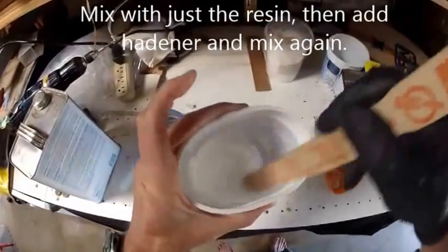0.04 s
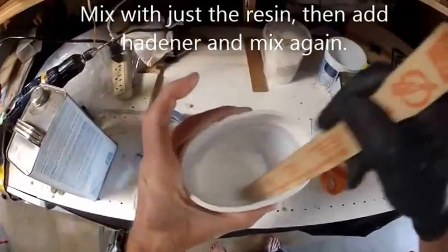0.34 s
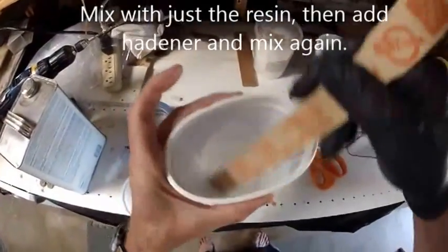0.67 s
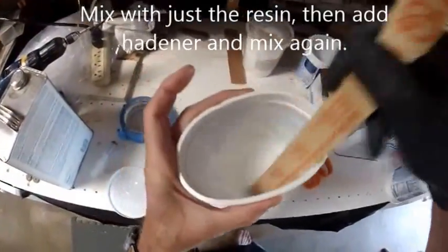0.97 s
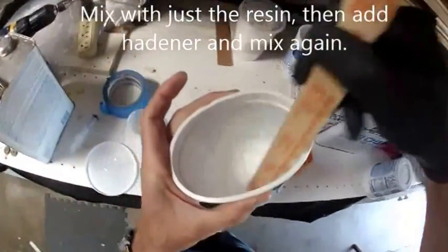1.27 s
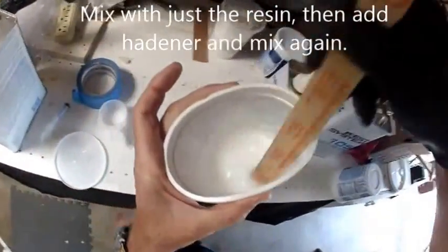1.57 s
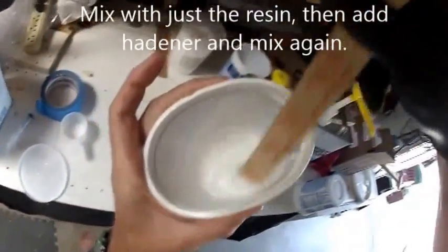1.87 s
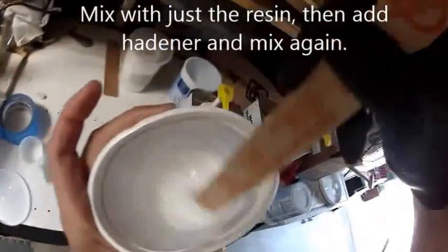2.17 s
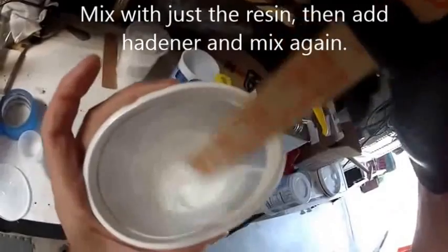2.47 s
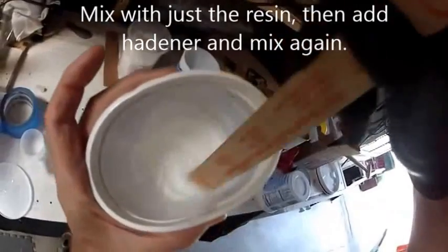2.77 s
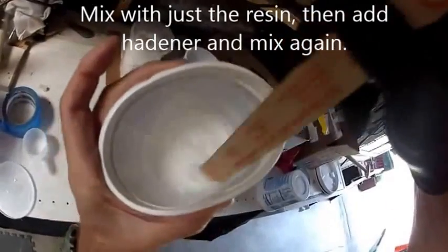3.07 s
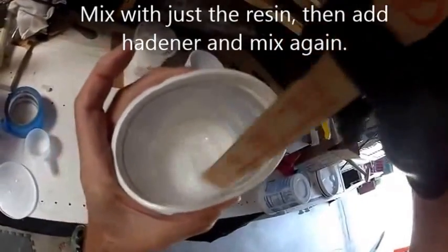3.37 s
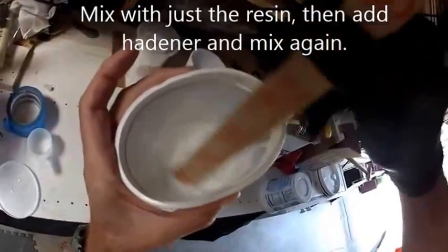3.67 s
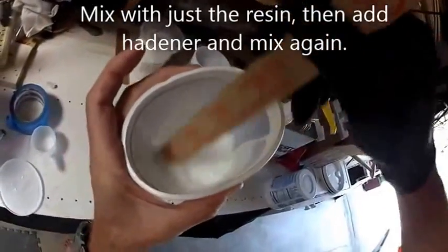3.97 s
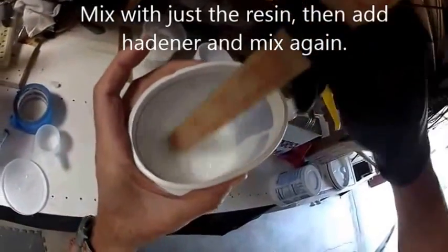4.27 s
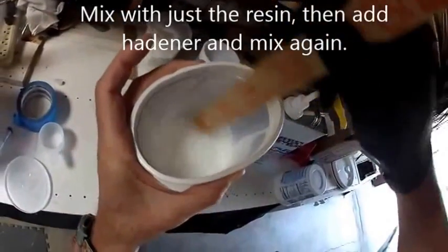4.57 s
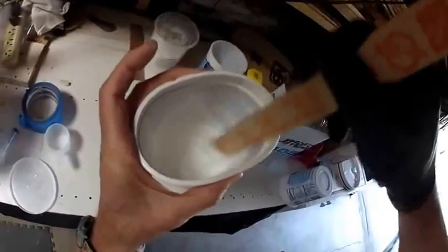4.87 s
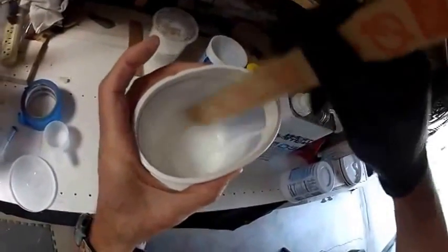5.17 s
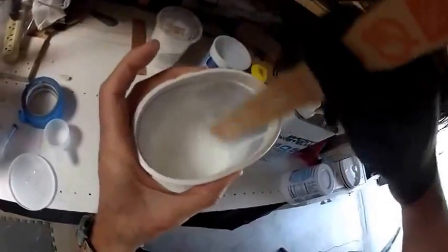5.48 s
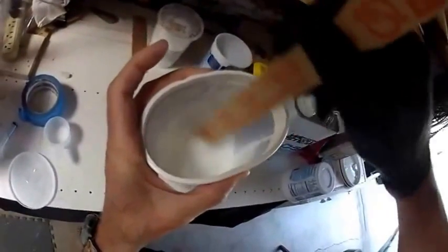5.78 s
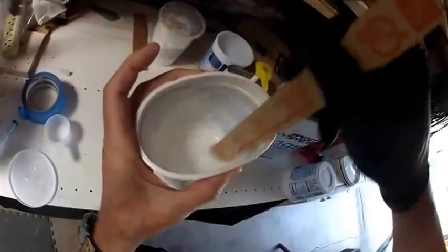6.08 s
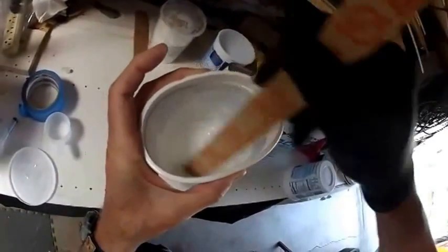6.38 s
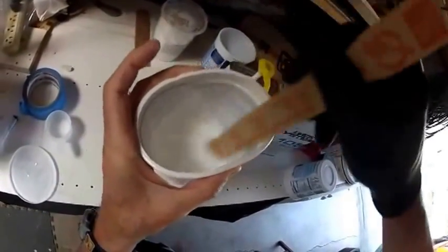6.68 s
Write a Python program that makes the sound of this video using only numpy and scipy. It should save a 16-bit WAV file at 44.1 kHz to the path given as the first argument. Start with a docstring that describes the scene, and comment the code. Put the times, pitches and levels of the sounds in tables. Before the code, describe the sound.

Quick, gritty scrapes and irregular hollow knocks run throughout as a wooden stick mixes resin around a plastic cup. Short rasps and a light sticky crackle come through, and the hardest knocks stand out sharply. After about four seconds the resin also closes behind the stick with soft, rising swishes. The microphone is very close, in a small workshop with little echo and faint low background noise.

```python
"""A wooden stick stirs resin in a hand-held plastic cup, close to a body-worn camera in a workshop.
From the start it drags along the wall about six times a second, among quicker, uneven knocks: friction
and impacts excite the cup's hollow ring, while threads of wet resin crackle. Now and then the edge
catches and rasps, and the hardest knocks overload the microphone. After about four seconds, as the
stirring goes on, the resin also begins to close behind the stick with dull, rising swishes."""
import sys
import numpy as np
from scipy import signal
from scipy.fft import rfft, irfft, next_fast_len
from scipy.io import wavfile
from scipy.ndimage import uniform_filter1d

SR = 44100
rng = np.random.default_rng(int(sys.argv[2]) if len(sys.argv) > 2 else 0)


def dump(signal):
    """Clip the signal to [-1, 1] and save it as 16-bit WAV at the path in sys.argv[1]."""
    limited = np.clip(np.atleast_2d(signal).T, -1, 1)
    pcm = np.round(limited * 32767).astype(np.int16)
    wavfile.write(sys.argv[1], SR, pcm)


N = 306054

# blows of the stick on the cup: (time [s], ring level [dB], tick level [dB], pitch of the cup [Hz])
KNOCKS = [(0.013,-9,-19,485), (0.0974,-12.5,-33.5,570), (0.1425,-11.5,-21.5,540), (0.1915,-13,-31,604),
          (0.209,-9,-23,575), (0.2675,-16,-23,500), (0.4295,-11.5,-30,544), (0.542,-3,-25,608),
          (0.621,-5.5,-29,559), (0.6955,-12,-35,520), (0.729,-12.5,-41,589), (0.819,-10.5,-30,560),
          (0.8255,2.5,-16,592), (0.871,-10,-31,592), (0.897,-9.5,-25,493), (1.0475,-10,-23,602),
          (1.1115,-11.5,-28.5,543), (1.215,-16,-21.5,620), (1.23,-9,-28,612), (1.255,-9,-40.5,555),
          (1.4035,-8.5,-19.5,544), (1.4725,-12.5,-39,520), (1.509,-10,-22,595), (1.623,-42,-31,560),
          (1.7394,-9,-22,590), (1.813,-9,-26,558), (1.9555,-9,-22.5,536), (2.0343,-13,-25.5,585),
          (2.045,-10,-22,587), (2.073,-11.5,-22.5,568), (2.1445,-14,-28,586), (2.3383,-11.5,-20.5,518),
          (2.47,-9,-27.5,538), (2.542,-16.5,-38,500), (2.611,-19,-24.5,460), (2.6288,-0.5,-5,580),
          (2.653,-8.5,-22,457), (2.887,-33,-24,493), (2.9297,-13,-23,595), (3.002,-9,-29,582),
          (3.0265,-5.5,-23,540), (3.0965,-13,-23,585), (3.256,-9.5,-26.5,555), (3.42,-21.5,-28,598),
          (3.4917,-28,-20,560), (3.575,-4.5,-24.5,564), (3.714,-11.5,-30,587), (3.843,-7,-18.5,528),
          (4.101,-12.5,-28,600), (4.1159,-3,-12.5,512), (4.154,-10,-25,590), (4.1853,-12,-48.5,580),
          (4.2288,-48,-28,487), (4.2505,-14.5,-25.5,560), (4.3607,-5.5,-22.5,590), (4.383,-8,-18.5,570),
          (4.4385,-7,-41.5,520), (4.6287,-2,-10.5,513), (4.6505,-7.5,-34.5,544), (4.898,-9.5,-12,536),
          (4.959,-12,-35,590), (5.043,-16.5,-26.5,576), (5.1482,-3.5,-26.5,558), (5.1753,-11,-16,468),
          (5.2513,-4,-28,544), (5.2868,-30,-26,486), (5.421,-10.5,-17,606), (5.479,-14,-17.5,533),
          (5.6155,-13.5,-40,546), (5.717,-4,-23.5,595), (5.792,-9.5,-17,547), (5.8309,-11.5,-33,460),
          (5.85,-9.5,-22,559), (6.0422,-22,-23,510), (6.055,-11,-31,540), (6.079,-10.5,-31.5,531),
          (6.14,-32,-24,585), (6.339,-10,-15,511), (6.406,-12,-31,610), (6.4546,-45,-26.5,584),
          (6.4893,-10,-23,610), (6.6097,-2,-17.5,572), (6.852,-11,-36,600), (6.866,-6,-14,497),
          (6.93,-6,-33.5,600)]
# drags along the wall: (start [s], end [s], grit level [dB], ring level [dB])
STROKES = [(0,0.03,-26.5,-20), (0.28,0.345,-26.5,-16), (0.391,0.464,-38,-27), (0.524,0.645,-27,-18),
           (0.685,0.754,-43,-22), (0.801,0.935,-31.5,-28), (1.017,1.083,-41,-33.5),
           (1.134,1.224,-31.5,-21.5), (1.298,1.359,-39,-28), (1.426,1.537,-35.5,-28.5),
           (1.747,1.904,-40,-24), (2.027,2.177,-39,-28), (2.334,2.512,-37,-28.5), (2.604,2.769,-32.5,-24.5),
           (2.921,3.113,-35.5,-23), (3.157,3.197,-28.5,-37), (3.237,3.408,-34.5,-24.5),
           (3.454,3.506,-27,-31.5), (3.544,3.667,-31.5,-24.5), (3.715,3.772,-27.5,-26),
           (3.811,3.924,-32,-26), (4.094,4.195,-33.5,-30), (4.362,4.434,-29.5,-17), (4.61,4.705,-31,-23.5),
           (4.746,4.804,-32.5,-26.5), (4.873,4.972,-29,-20.5), (5.037,5.129,-34.5,-29),
           (5.172,5.281,-32.5,-18.5), (5.315,5.362,-36,-31), (5.466,5.549,-35,-19.5), (5.606,5.707,-32,-28),
           (5.772,5.852,-34,-16.5), (5.918,5.938,-29.5,-25), (6.037,6.124,-31,-22.5),
           (6.174,6.213,-34.5,-26), (6.266,6.282,-28,-28), (6.315,6.413,-33.5,-20.5),
           (6.466,6.521,-32.5,-20.5), (6.598,6.658,-28.5,-23), (6.746,6.794,-34.5,-22),
           (6.857,6.955,-33,-22.5)]
# spectrum of friction and crackle: (frequency [Hz], level [dB])
GRIT_SPECTRUM = [(100, 12.5), (700, -4), (1100, 11), (1700, 2.5), (2500, 4.5), (3600, 3.5), (4700, 0),
                 (5500, 1), (7300, -2), (8600, 1.5), (10000, -3.5), (10800, -9), (13300, -9), (14800, -3)]


def amp(db):
    """Amplitude ratio of a level in decibels."""
    return 10 ** (np.asarray(db) / 20)


def unit(x):
    """Normalisation to rms 1."""
    return x / np.sqrt(np.mean(x ** 2) + 1e-20)


def read(points, hz):
    """Interpolation on a logarithmic frequency axis."""
    f, value = np.transpose(points)
    return np.interp(np.log(hz + 1), np.log(f), value)


def add(mix, start_s, sound):
    """Superposition of a sound on the mix."""
    part = mix[max(round(start_s * SR), 0):][:len(sound)]
    part += sound[:len(part)]


def minimum_phase(db_at, size=2048):
    """Causal impulse response of a gain curve: phase follows from log gain by the Hilbert transform."""
    log_gain = np.log(amp(db_at(abs(np.fft.fftfreq(size, 1 / SR)))))
    spectrum = np.exp(np.conj(signal.hilbert(log_gain)))
    return np.fft.ifft(spectrum).real[:size // 2]


def colour(x, spectrum):
    """Spectral shaping by convolution, row by row, keeping the energy of white input."""
    response = minimum_phase(lambda hz: read(spectrum, hz))
    response = (response / np.linalg.norm(response)).reshape((1,) * (x.ndim - 1) + (-1,))
    return signal.oaconvolve(x, response, axes=-1)[..., :x.shape[-1]]


def wander(per_s, step=16):
    """Random modulation: Gaussian noise low-passed near per_s hertz, rms 1."""
    size = next_fast_len(N // step + 2)
    hz = np.fft.rfftfreq(size, step / SR)
    spectrum = rfft(rng.standard_normal(size)) * np.exp(-(hz / per_s) ** 2)
    return np.interp(np.arange(N) / step, np.arange(size), unit(irfft(spectrum, size)))


def slips(per_s, spread_db):
    """Poisson process of impulses with uneven size and random sign, rms 1."""
    size = amp(spread_db * np.minimum(rng.exponential(1, N), 4))
    return unit(size * rng.choice([-1, 1], N) * (rng.random(N) < per_s / SR))


def stumbles(per_s, unevenness, drift_per_s=40):
    """Quasi-periodic train of equal impulses whose rate drifts, rms 1."""
    cycles = np.cumsum(per_s * np.exp(unevenness * wander(drift_per_s))) / SR
    return unit(np.diff(np.floor(cycles), prepend=0))


def crumble(clicks, decay_s):
    """Exponential decay spreads each click's energy into a burst of noise, rms 1."""
    power = signal.lfilter([1], [1, -np.exp(-2 / (decay_s * SR))], clicks ** 2 + 1e-18)
    return unit(np.sqrt(power) * rng.standard_normal(N))


def resonate(x, hz, width_hz):
    """Damped resonator of gain 1 whose centre follows the curve hz."""
    angle = (2 * np.pi * (np.cumsum(hz / SR) % 1)).astype(np.float32)
    phasor = np.cos(angle) + 1j * np.sin(angle)
    pole = np.exp(-np.pi * width_hz / SR)
    return 2 * (phasor * signal.lfilter([1 - pole], [1, -pole], x * phasor.conj() + 1e-18)).real


def workshop_air(level_db=-46):
    """Stationary background noise, strongest in the bass."""
    # spectrum of the air: (frequency [Hz], level [dB])
    air_spectrum = [(20, -21), (45, 3), (90, -3.5), (170, -9), (300, -1.5), (600, -76), (1200, -41),
                    (3500, -26), (8000, -26), (16000, -78)]
    return amp(level_db) * colour(rng.standard_normal(N), air_spectrum)


def reverberate(x, wet_db=-16, gap_s=0.015):
    """Reverberation: faint reflections from bench and shelves decay at each band's own rate."""
    # decay of the workshop: (frequency [Hz], t60 [s])
    decay_times = [(150, 0.19), (600, 0.28), (3000, 0.2), (8000, 0.18), (15000, 0.96)]
    count = SR // 2
    echoes = rng.choice([-1., 1.], count) * (rng.random(count) < .06) * (np.arange(count) > gap_s * SR)
    hz, t, bands = signal.stft(echoes, SR, nperseg=256)
    decay = amp(-60 * t / read(decay_times, hz)[:, None])
    tail = signal.istft(bands * decay, SR, nperseg=256)[1]
    return x + amp(wet_db) * signal.fftconvolve(x, tail / np.linalg.norm(tail))[:N]


def contact_force(levels_db, grip_s=0.00089, arch_db=1, release_s=0.0058):
    """Normal force on the wall: each stroke grips quickly, bears down most midway, and lets go."""
    force = np.zeros(N)
    for (start, end, *_), db in zip(STROKES, levels_db):
        length = max(end - start, .01)
        t = np.arange(0, length + 8 * release_s, 1 / SR)
        arch = np.sin(np.pi * np.minimum(t / length, 1)) - 2 / np.pi
        contact = (1 - np.exp(-t / grip_s)) * np.exp(-np.maximum(t - length, 0) / release_s)
        add(force, start, amp(db + arch_db * arch) * contact)
    return force


def effort(flow_s=0.088):
    """Stirring effort, rms 1: a moving average, since the resin keeps flowing around each stroke."""
    evened_force = np.sqrt(contact_force([ring_db for *_, ring_db in STROKES]))
    return unit(uniform_filter1d(evened_force, round(flow_s * SR)))


def stick_modes(x, wood_db, slide=0.1):
    """The stick's bending resonances slide with the contact point and colour x at constant energy."""
    # bending modes: (frequency [Hz], bandwidth [Hz], level [dB])
    modes = [(1104, 29, -8), (1624, 123, 2), (2346, 80, 0.5), (3137, 103, 0), (3600, 205, 1),
             (5710, 590, -5), (7750, 77, 0)]
    wood = sum(amp(db) * resonate(x, hz * np.exp(slide * wander(per_s=29.3)), width)
               for hz, width, db in modes)
    return unit(x + amp(wood_db) * wood) * np.std(x)


def cup_ring(pitch_hz, damping, contact_s=0.00041, rest_hz=574.6):
    """Modal impulse response, energy 1: shell modes alternate in sign, so they swell and then cancel."""
    # modes of base and walls, which shift with flexing: (frequency at rest [Hz], level [dB], t60 [s])
    shell_modes = [(243, -19.5, 0.042), (421, -3.5, 0.037), (472, 0.5, 0.031), (574.8, 3, 0.045)]
    # steady modes of the cup and the air in it: (frequency [Hz], level [dB], t60 [s])
    hollow_modes = [(577.7, -5.5, 0.05), (742.5, -14.5, 0.033), (900, -2.5, 0.0075), (1094, -9.5, 0.029)]
    t = np.arange(3500) / SR
    modes = [((-1) ** (k + 1), hz * pitch_hz / rest_hz, db, t60)
             for k, (hz, db, t60) in enumerate(shell_modes)]
    modes += [(1, *mode) for mode in hollow_modes]
    ring = sum(sign * amp(db - 60 * t * damping / t60) * np.sin(2 * np.pi * hz * t)
               for sign, hz, db, t60 in modes)
    ring *= 1 - np.exp(-t / contact_s)
    return ring / np.linalg.norm(ring)


def flexing(push, low_hz=490, high_hz=590, damping=1.15):
    """Forced vibration: the cup, damped by the stick, blends between two tunings as its wall bends."""
    bend = np.pi / 4 * (1 + np.tanh(2 * wander(per_s=7.7)))
    slack = signal.oaconvolve(push * np.cos(bend) ** 2, cup_ring(low_hz, damping))[:N]
    taut = signal.oaconvolve(push * np.sin(bend) ** 2, cup_ring(high_hz, damping))[:N]
    return slack + taut


def handling(level_db=-42, lump_db=3, thump_db=-23, thump_hz=190, thump_s=0.0064, yield_db=-11):
    """Compliance of the hand: the cup gives, with dull lumps along strokes and a thump at each blow."""
    # spectrum of the lumps: (frequency [Hz], level [dB])
    lump_spectrum = [(25, -42), (70, 0.5), (130, -0.5), (260, -3.5), (400, -1.5), (800, -32), (3000, -52)]
    lumps = effort() * unit(amp(lump_db * wander(per_s=25))) * slips(per_s=400, spread_db=3)
    out = amp(level_db) * colour(lumps, lump_spectrum)
    t = np.arange(SR // 30) / SR
    envelope = t / thump_s * np.exp(1 - t / thump_s)
    for start, hollow_db, *_ in KNOCKS:
        hz = thump_hz * np.exp(rng.random() - .5)
        give_db = min(hollow_db, yield_db)  # the grip yields only so far
        add(out, start, amp(give_db + thump_db) * envelope * np.sin(2 * np.pi * hz * t))
    return out


def gulps(low_hz=230, high_hz=400):
    """Cavity resonance: a hollow in the resin shrinks as it closes, so its broad peak climbs."""
    # resin closing behind the stick: (start [s], end [s], level [dB])
    closures = [(4.314, 4.41, -34.5), (4.54, 4.62, -35.5), (5.075, 5.176, -31.5), (5.366, 5.426, -33),
                (6.829, 6.89, -28)]
    out = np.zeros(N)
    for start, end, db in closures:
        length = round((end - start) * SR)
        hz = np.geomspace(low_hz, high_hz, length)
        pocket = resonate(rng.standard_normal(length), hz, width_hz=170)
        pocket = resonate(pocket, hz, width_hz=220)
        add(out, start, amp(db) * unit(pocket * signal.windows.tukey(length, .5)))
    return out


def resin(crackle_db=-43, pop_db=-41, tug_db=-39, swell_db=2, rest_db=-4, wood_db=8):
    """Rupture and adhesion: sticky threads snap, a few bubbles pop, and the resin tugs at the cup."""
    swell = unit(amp(swell_db * wander(per_s=21)))
    stir = effort()
    threads = amp(crackle_db) * unit(swell * (amp(rest_db) + stir)) * slips(per_s=1500, spread_db=3)
    bubbles = (1.17 + stir) * stumbles(per_s=30, unevenness=.8) * amp(3.7 * wander(per_s=106))
    pops = amp(pop_db) * crumble(bubbles, decay_s=0.0019)
    tugs = unit(swell * (0.81 + stir)) * slips(per_s=620, spread_db=7)
    return stick_modes(colour(threads + pops, GRIT_SPECTRUM), wood_db) + amp(tug_db) * flexing(tugs)


def rasping(level_db=1, slip_hz=750, wood_db=2):
    """Stick-slip oscillation: the caught edge chatters and hisses; a wet edge sounds duller."""
    # catches of the edge: (start [s], end [s], level [dB], treble cutoff [Hz])
    catches = [(0.035, 0.053, -24.5, 8800), (0.332, 0.366, -24.5, 9100), (1.22, 1.238, -36, 4030),
               (1.95, 1.998, -31, 3730), (3.736, 3.759, -26, 3900), (4.67, 4.691, -22, 8000),
               (4.958, 4.982, -27, 8100), (5.539, 5.582, -23.5, 11300), (5.647, 5.662, -30, 3970),
               (5.834, 5.873, -23.5, 9000), (6.087, 6.132, -22.5, 9000), (6.634, 6.669, -23, 8500)]
    # spectrum of a rasp: (frequency [Hz], level [dB])
    rasp_spectrum = [(150, 7), (900, -10), (1900, -4), (2300, 10), (3000, 1.5), (4200, 5), (4700, 0),
                     (5300, 9), (6700, 7.5), (7400, -1), (8300, 1.5), (9700, 2.5), (10700, -31), (14800, 7)]
    chatter = stumbles(slip_hz, unevenness=0.13, drift_per_s=230)
    hiss = rng.standard_normal(N)
    rub = stick_modes(colour(chatter - chatter.mean() + hiss, rasp_spectrum), wood_db)
    out = np.zeros(N)
    for start, end, db, cutoff_hz in catches:
        low_pass = signal.butter(3, cutoff_hz, fs=SR, output="sos")
        burst = signal.sosfilt(low_pass, rub[round(start * SR):][:round((end - start) * SR)])
        add(out, start, amp(db + level_db) * unit(burst * signal.windows.tukey(len(burst), .5)))
    return out


def scraping(grit_db=-1, snag_db=-5, ring_db=-7.5, hop_db=-3, judder_db=4.5, wood_db=8):
    """Sliding friction: fine fibre slips make grit, snags click, coarse slips and hops ring the cup."""
    _, _, grit_levels, ring_levels = np.transpose(STROKES)
    judder = unit(amp(judder_db * wander(per_s=34)))
    hops = stumbles(per_s=40, unevenness=.35)
    fine_slips = amp(grit_db) * judder * slips(per_s=4500, spread_db=0.5)
    snags = amp(snag_db) * crumble(hops + slips(per_s=70, spread_db=3), decay_s=0.0013)
    push = amp(ring_db) * slips(per_s=900, spread_db=2) + amp(hop_db) * hops
    grit = colour(contact_force(grit_levels) * (fine_slips + snags), GRIT_SPECTRUM)
    return stick_modes(grit, wood_db) + flexing(contact_force(ring_levels) * push)


def knocks(ring_db=-5.5, tick_db=1.5, crush_s=0.0019, rattle_db=-20, rattle_s=0.023,
           damping=0.87, grip_spread=0.83, contact_s=0.00026, softness=0.75, bare_db=7, wood_db=3):
    """Impact excitation: each blow rings the cup; wood crushing on plastic adds a tick and a rattle."""
    # spectrum of a tick on the thin wall: (frequency [Hz], level [dB])
    tick_spectrum = [(100, 3.5), (700, 2), (1100, -3), (1700, -0.5), (3300, -2.5), (4100, -5.5),
                     (4600, -12), (5400, -12.5), (7300, -17), (8500, -6.5), (10200, -12.5), (10900, -17),
                     (13300, -13), (14800, -14)]
    rings, ticks = np.zeros(N), np.zeros(N)
    t = np.arange(SR // 40) / SR
    ring_energy, tick_energy = .01 * SR, .004 * SR  # as of 10 ms and 4 ms at rms 1
    fade = np.exp(-t / crush_s) + amp(rattle_db) * np.exp(-t / rattle_s)
    crushes = colour(rng.standard_normal((len(KNOCKS), len(t))) * fade, tick_spectrum)
    for (start, hollow_db, sharp_db, pitch_hz), crush in zip(KNOCKS, crushes):
        hand_damping = damping * np.exp(grip_spread * (2 * rng.random() - 1))
        # a blow cushioned by resin hardly ticks and swells slowly
        cushion_s = contact_s * amp(softness * np.clip(hollow_db - sharp_db - bare_db, 0, 30))
        ring = np.sqrt(ring_energy) * cup_ring(pitch_hz, hand_damping, cushion_s)
        tick = np.sqrt(tick_energy) * crush / np.linalg.norm(crush)
        add(rings, start - cushion_s / 2, amp(hollow_db + ring_db) * ring)
        add(ticks, start, amp(sharp_db + tick_db) * tick)
    return rings + stick_modes(ticks, wood_db)


def scene():
    """Superposition of the cup's sounds, their reflections and the steady air."""
    cup = knocks() + scraping() + rasping() + resin() + gulps() + handling()
    return (reverberate(cup) + workshop_air())[None]


def record(dry, low_cut_hz=32, high_cut_hz=15500):
    """Filtering and saturation: bass loss, housing resonances, clipped peaks, then a steep treble cut."""
    # notches and resonances of the camera housing: (frequency [Hz], width [Hz], gain [dB])
    housing_bands = [(1278, 277, -11.5), (5975, 460, -9), (11483, 157, 18.5), (12090, 534, -21),
                     (12440, 186, 22.5)]
    housing = minimum_phase(lambda hz: sum(db * np.exp(-2 * ((hz - centre) / width) ** 2)
                                           for centre, width, db in housing_bands))
    heard = signal.sosfilt(signal.butter(1, low_cut_hz, "high", fs=SR, output="sos"), dry)
    clipped = np.clip(signal.oaconvolve(heard, housing[None])[:, :N], -1, 1)
    low_pass = signal.firwin(255, high_cut_hz, window=("kaiser", 8), fs=SR)
    return signal.oaconvolve(clipped, low_pass[None], "same")


dry = scene()
out = record(dry)
dump(out)
```